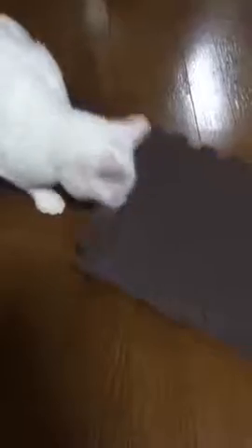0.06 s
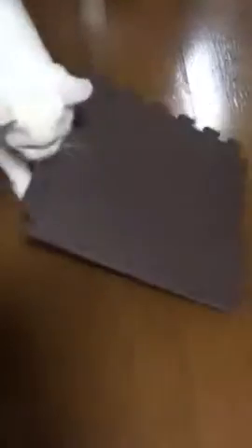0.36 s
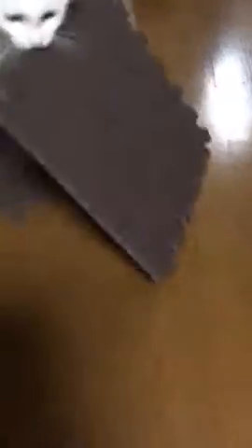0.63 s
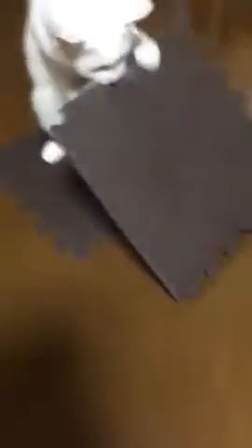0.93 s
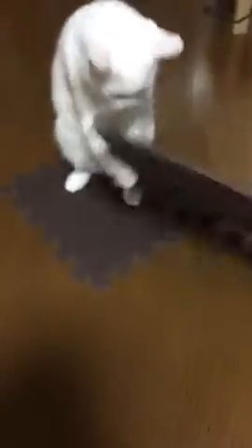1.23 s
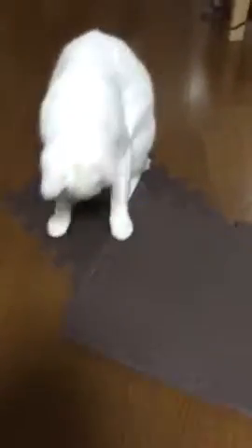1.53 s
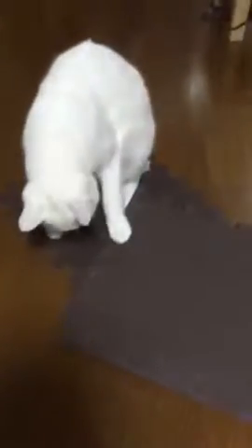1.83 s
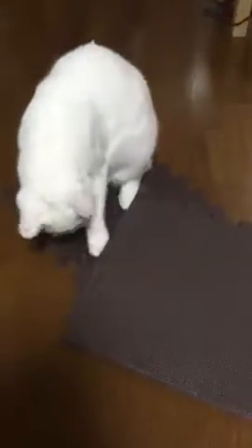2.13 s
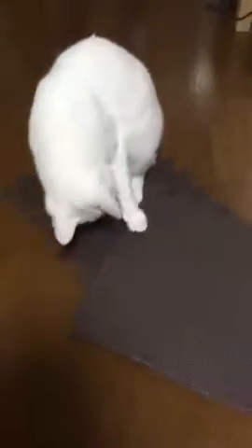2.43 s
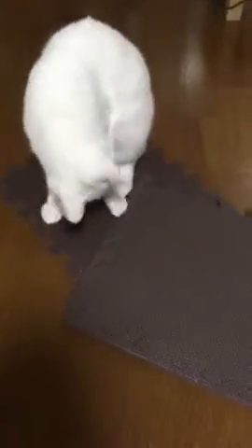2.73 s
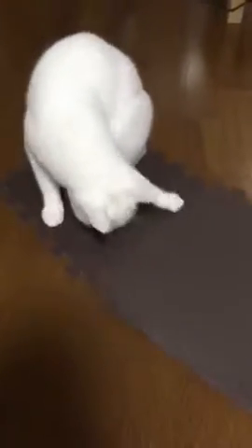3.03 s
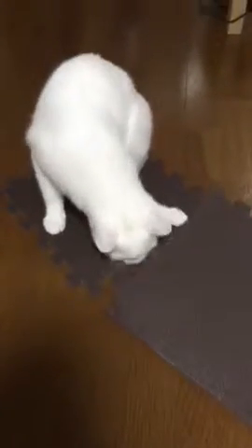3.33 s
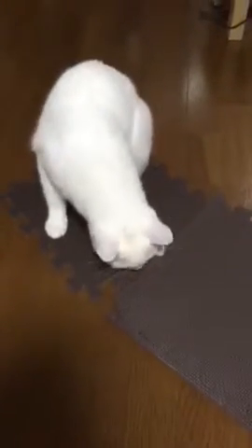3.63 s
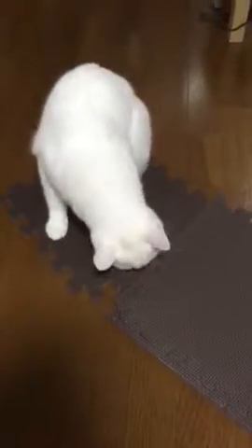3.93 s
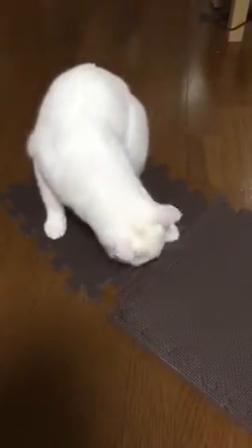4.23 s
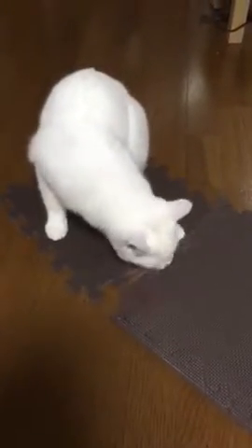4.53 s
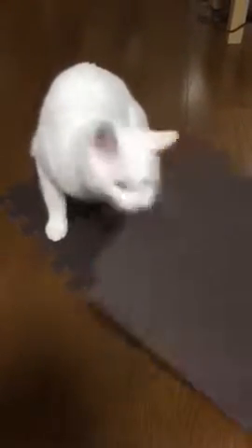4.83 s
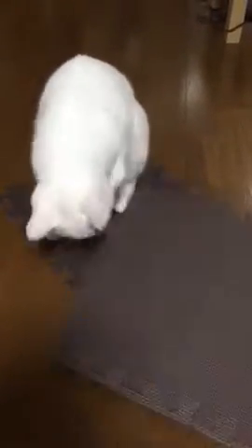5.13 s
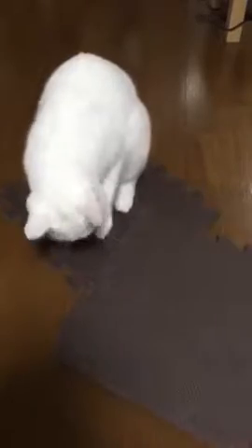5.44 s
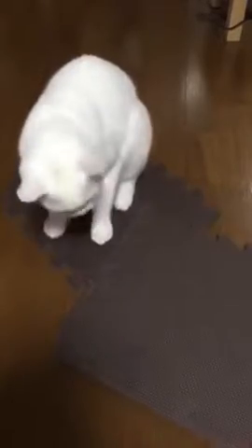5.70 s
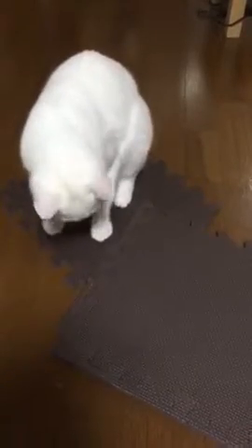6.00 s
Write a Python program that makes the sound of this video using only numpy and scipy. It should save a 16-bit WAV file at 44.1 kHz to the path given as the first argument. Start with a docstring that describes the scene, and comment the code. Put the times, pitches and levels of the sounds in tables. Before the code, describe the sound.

Claws snap out of a foam mat, which flops and slides lightly on a wooden floor while an appliance hums quietly.

```python
"""A cat picks at a loose foam floor mat in a small room with a wooden floor.
Claws and teeth snap out of the foam, twice loudly, and the mat taps and flops onto the boards.
A faint squeak follows, then soft strokes of paws and mat sliding, with a few light taps.
Near the end the mat swishes as it lifts and lands in a flurry of taps, snaps and thumps.
A mains appliance hums quietly throughout."""
import sys
import numpy as np
from scipy import signal
from scipy.fft import rfft, irfft, next_fast_len
from scipy.io import wavfile
from scipy.ndimage import uniform_filter1d

SR = 44100
rng = np.random.default_rng(int(sys.argv[2]) if len(sys.argv) > 2 else 0)


def unload_audio(sound):
    """Save the sound as a 16-bit wav file, at the path given as the first command line argument."""
    columns = np.transpose(np.atleast_2d(sound))
    # keep every value between -1 and 1, then stretch to whole-number steps
    steps = np.round(np.clip(columns, -1, 1) * 32767)
    wavfile.write(sys.argv[1], SR, steps.astype(np.int16))


N = 267521

# modes of the floor boards: f/Hz, width/Hz, gain/dB
BOARD_MODES = [(476, 280, 0.5), (699, 70, -1), (940, 210, 0), (1173, 122, -2.5), (1340, 160, 0.5),
               (1610, 180, -6), (1950, 290, -5), (2300, 850, -3.5), (3740, 2000, 1.5)]


def snaps(echo_db=-1.0):
    """Foam cells tear as a claw or tooth lets go: a very short, bright crack."""
    # slips off the foam: t/s, level/dB, tearing time/ms, tilt above 2 kHz/(dB per octave)
    tears = [(.3306, -20, 1.36, 1.5), (0.72, -57, 3.4, -5), (.728, -46.5, 2.2, -3.5),
             (.842, -53.5, 11, 4.5), (.877, -51.5, 3.2, -1.5), (1.092, -45.5, 1.5, 5.5),
             (1.178, -45.5, 1.8, 3.5), (1.2072, -21, 1.4, 0), (1.346, -54, 2.4, -1.5),
             (1.398, -55.5, 3.5, 7), (1.449, -55.5, 8.8, 1), (1.574, -40.5, 8.7, -6.5),
             (1.6029, -33.5, 0.72, -6.5), (2.483, -53, 2.2, -6.5), (2.498, -56, 2, -8),
             (3.119, -51, .7, -5), (3.843, -54, 5, 4), (4.42, -56.5, 2.2, -2.5), (4.515, -59.5, 1.5, 1.5),
             (4.934, -45.5, 1.8, 4.5), (4.939, -43.5, 1.4, -0.5), (5.103, -54, 4, 9),
             (5.229, -52.5, 0.74, 1), (5.3085, -47, 1, -5.5), (5.333, -46.5, .58, -8),
             (5.357, -35, 0.88, -6.5), (5.3646, -43, .79, -10), (5.416, -45, 1.1, -8),
             (5.805, -50.5, 1.3, 12.5)]
    # tone of tearing foam: f/Hz, gain/dB
    tear_spectrum = [(300, -18.5), (900, -8.5), (2500, 1), (3500, -6.5), (5200, -3), (6400, 2), (7500, 0.5),
                     (9700, 2.5), (10800, -2.5), (11800, 5.5), (13000, -1.5), (15000, 5), (16500, -15)]
    out = np.zeros(N)
    for start, db, tear_ms, tilt in tears:
        tear = rupture(tear_ms, grain_db=4.0)
        hz = bins(len(tear))
        tone = at_hz(tear_spectrum, hz) + tilt * np.log2(np.maximum(hz, 2000))
        add(out, start, radiate(tear, tone - tone.max(), db, echo_db))
    return out


def taps(hollow_db=5, hollow_octaves=0.61, mode_shift=0.062, tap_echo_db=2.5, flex_echo_db=3.0):
    """The mat's edge slaps the boards with a dull, hollow tick, and the sheet flexes in damped modes."""
    # edge hits: t/s, tap level/dB, tap centre/Hz, contact time/ms, flex level/dB
    hits = [(.248, -52.5, 1015, 3.5, -51), (.331, -36.5, 1030, 0.35, -54), (.4719, -41, 1020, 2.3, -44.5),
            (.486, -50, 1150, 13, -48.5), (.614, -58, 1080, 11, -60), (.727, -60, 1440, 13, -50),
            (0.8413, -44.5, 546, 1.4, -37), (.852, -50, 910, 1.8, -37.5), (1.074, -42, 1210, 1.5, -38.5),
            (1.2075, -25, 1020, 1.1, -23), (1.578, -29, 1390, 3.3, -35), (1.603, -36, 1470, 6.7, -33.5),
            (2.483, -50, 1720, 7.3, -58), (2.812, -56, 1700, 1.4, -76), (3.023, -68, 1000, 8.4, -51.5),
            (3.06, -65, 1000, 8.2, -54), (3.093, -51, 1910, 7.3, -49.5), (3.136, -47, 1000, 3, -56),
            (3.143, -40, 2160, 5.5, -55), (3.156, -48.5, 1500, 3.3, -45), (3.589, -61, 1200, 5, -72),
            (3.736, -61.5, 1200, 4.6, -70.5), (3.867, -60, 1300, 3.2, -59), (4.934, -47, 766, 2.1, -46),
            (5.087, -59, 780, 4.5, -49), (5.11, -42.5, 1050, 0.78, -47), (5.221, -44, 1190, 0.69, -43),
            (5.228, -37.5, 740, 4.1, -39.5), (5.306, -38, 824, 4.1, -44), (5.333, -41, 1190, 5.6, -44.5),
            (5.358, -41.5, 1980, 4.5, -41.5), (5.385, -38, 1560, 3.9, -46.5), (5.402, -41, 1320, 4.1, -44),
            (5.416, -52, 1980, 13, -48.5)]
    # bending modes of the foam sheet: f/Hz, width/Hz, gain/dB
    sheet_modes = [(140.6, 18, -1.5), (212, 84, 1), (298, 64, -0.5), (397, 55, -1.5), (570, 94, -10)]
    low_order, high_order = 1.3, 2.35  # steepness below and above the tap's centre
    out = np.zeros(N)
    for start, tap_db, centre_hz, contact_ms, flex_db in hits:
        contact = rupture(contact_ms, grain_db=3)
        hz = bins(len(contact))
        ratio = np.maximum(hz, 20) / centre_hz
        # each tap is strongest around its centre and falls away steeply in the treble
        skirts = 10 * np.log10((1 + ratio ** (-2 * low_order)) * (1 + ratio ** (2 * high_order)))
        # air trapped under the edge resonates at that centre
        hollow = hollow_db * np.exp(-(np.log2(ratio) / hollow_octaves) ** 2)
        tap_tone = resonances(BOARD_MODES, hz) + hollow - skirts
        add(out, start, radiate(contact, tap_tone, tap_db, tap_echo_db))
        # each grip bends the sheet differently, which shifts its modes
        bend = resonances(sheet_modes, hz * np.exp(mode_shift * rng.standard_normal()))
        soak = 10 * np.log10(1 + (hz / 750) ** 4)  # foam soaks up the treble
        add(out, start, radiate(contact, bend - soak, flex_db, flex_echo_db))
    return out


def thumps():
    """Weight lands on a cushion of air: a few low cycles swell and fade."""
    # soft landings of mat and paws: t/s, level/dB, f/Hz, swell/ms
    landings = [(.85, -36.5, 130, 11), (0.874, -45, 64.5, 9.6), (1.101, -46.5, 76, 25),
                (1.2086, -23.5, 253, 2.6), (1.33, -38.5, 72, 8.2), (1.409, -47, 65, 9.2),
                (1.579, -28, 109, 6.6), (1.621, -32, 82, 8.4), (1.662, -44, 56, 12),
                (3.139, -47.5, 71.4, 9.2), (4.861, -47.5, 75, 16), (4.913, -51, 73, 16),
                (5.304, -38.5, 73, 5.8), (5.372, -47, 73, 18)]
    out = np.zeros(N)
    t = np.arange(SR // 4) / SR
    for start, db, hz, swell_ms in landings:
        age = t * 1000 / swell_ms
        envelope = from_db(db) * age * np.exp(1 - age)
        add(out, start, envelope * np.sqrt(2) * np.sin(2 * np.pi * hz * t))
    return out


def slide(hiss_trim_db=-1, scrape_trim_db=-2.5, board_share=0.65, echo_db=1.0):
    """Paws and mat drag: a fine hiss from the texture, a coarser scrape that stirs the boards."""
    # rubs over the foam, before the trims: t/s, swell/s, hold/s, hiss level/dB, scrape over hiss/dB
    strokes = [(-0.001, 0.17, .005, -56.5, -7), (0.14, 0.025, 0.13, -62.5, -2),
               (0.385, 0.068, 0.096, -64.5, -17), (0.522, 0.098, 0.074, -60.5, -13.5),
               (0.815, 0.019, 0.13, -66.5, -5.5), (0.996, 0.013, 0.017, -57, -7),
               (1.023, 0.072, 0.12, -58.5, -7), (1.484, 0.056, 0.095, -65, -7),
               (1.674, 0.047, 0.18, -79, 9.5), (2.177, 0.16, .015, -62.5, -1),
               (2.597, 0.058, 0.024, -57, -5.5), (2.72, 0.023, .01, -66, -10),
               (2.786, 0.064, 0.044, -65, 0.5), (2.932, 0.054, .21, -56, -3),
               (3.577, 0.013, .005, -67, -10), (3.718, 0.017, .01, -67, -5), (3.812, 0.023, .025, -70, 2.5),
               (3.991, 0.036, .015, -65, 0), (4.137, 0.055, 0.12, -65.5, -1), (4.382, 0.034, .03, -71.5, 1),
               (4.66, 0.072, 0.21, -64.5, -5), (4.946, 0.019, .005, -52.5, -8),
               (5.13, 0.066, .02, -73, -13), (5.274, 0.061, 0.14, -66, 3.5), (5.91, 0.15, .02, -66, -3)]
    # tone of the fine hiss: f/Hz, gain/dB
    hiss_spectrum = [(1500, -31.5), (3000, -17), (4800, -3.5), (6000, -1), (7700, -1.5), (9200, 6),
                     (10500, 0.5), (12000, 6), (14500, 4.5), (15700, 2), (16200, -17)]
    # tone of the coarse scrape: f/Hz, gain/dB
    scrape_spectrum = [(250, -24), (500, -4), (750, -9), (1000, -3), (1400, -3), (2200, -6), (3500, -6.5),
                       (4900, -17.5), (6500, -8), (9000, -26.5)]
    hiss_power, scrape_power = np.zeros((2, N))
    for start, swell, hold, db, scrape_db in strokes:
        power = (from_db(db) * stroke(start, swell, hold)) ** 2
        hiss_power += power
        scrape_power += power * from_db(scrape_db) ** 2
    hz = np.geomspace(200, 10000, 200)
    scrape_tone = at_hz(scrape_spectrum, hz) + board_share * resonances(BOARD_MODES, hz)
    hiss = friction(hiss_spectrum, grain_db=1.0, flutter_db=1.0)
    scrape = friction(np.column_stack([hz, scrape_tone]), grain_db=-0.5, flutter_db=1.2)
    rub = from_db(hiss_trim_db) * np.sqrt(hiss_power) * hiss
    rub += from_db(scrape_trim_db) * np.sqrt(scrape_power) * scrape
    echoes = signal.fftconvolve(rub, room(tone_db=np.zeros(SR // 8)))[:N]
    return rub + from_db(echo_db) * echoes


def swish(level_db=-61.5):
    """The lifted mat brushes past its neighbour with a narrow hiss."""
    # resonances of the brushing mat: f/Hz, width/Hz, gain/dB
    peaks = [(3900, 600, -5), (6850, 1200, 2), (8600, 1500, -9)]
    hz = np.geomspace(200, 16000, 200)
    rub = friction(np.column_stack([hz, resonances(peaks, hz)]), grain_db=0.0, flutter_db=1.0)
    return from_db(level_db) * stroke(start_s=4.705, swell_s=0.052, hold_s=0.017) * rub


def squeak(middle_s=1.82, length_s=0.29, top_hz=2340, drop_hz=380, jitter=0.02):
    """A thin, unsteady squeak rises and falls once; only the overtones of its pitch sound."""
    # overtones: multiple of the pitch, level/dB
    partials = [(2, -77), (3, -86), (4, -84)]
    t = np.arange(N) / SR
    droop = np.minimum(((t - middle_s) / (length_s / 2)) ** 2, 1)
    pitch_hz = (top_hz - drop_hz * droop) * (1 + jitter * drift(300))
    phase = 2 * np.pi * np.cumsum(pitch_hz) / SR
    tone = sum(from_db(db) * np.sin(multiple * phase) for multiple, db in partials)
    return np.sqrt(2 * (1 - droop)) * tone


def room(tone_db, early_db=6, early_s=0.0065):
    """Dense echoes from near walls, drawn afresh at random for each sound; the bass rings longest."""
    # reverb bands: f/Hz, t60/s, echo level/dB
    bands = [(100, .4, -4), (243, 0.46, -6.5), (598, 0.25, -5.5), (1400, 0.26, -7), (3000, .29, -3.5),
             (6950, 0.26, -7), (14100, 0.22, -8)]
    size = 2 * (len(tone_db) - 1)
    t, hz = np.arange(size) / SR, bins(size)
    noise = rfft(rng.standard_normal(size)) * rms_one(from_db(tone_db))
    log_centres = np.log([row[0] for row in bands])
    # the first reflections, off the nearest surfaces, stand above the diffuse tail
    arrival = np.clip((t - 0.002) / 0.0026, 0, 1) * from_db(early_db * np.exp(-t / early_s))
    echoes = np.zeros(size)
    for share, (_, t60, db) in zip(np.eye(len(bands)), bands):
        band = irfft(noise * np.interp(np.log(hz + 1), log_centres, share), size)
        fade = np.exp(-np.log(1000) * t / t60) * arrival
        echoes += from_db(db) * band * fade / np.sqrt(np.sum(fade ** 2))
    return echoes


def hum(waver_db=-1.0):
    """A mains appliance hums, wavering a little in pitch and level."""
    # mains harmonics: f/Hz, level/dB
    harmonics = [(59.8, -65), (119.7, -50.5), (179.4, -72.5), (299, -79.5), (359, -78), (479, -82),
                 (538, -90.5)]
    t = np.arange(N) / SR + 0.0002 * drift(4.9)
    tone = sum(from_db(db) * np.sin(2 * np.pi * (hz * t + rng.random())) for hz, db in harmonics)
    return np.sqrt(2) * tone * from_db(waver_db * drift(5))


def air(level_db=-59):
    """The still air of the room: a steady, low bed of noise."""
    # room tone: f/Hz, gain/dB
    air_spectrum = [(20, -32), (32, -4), (60, -5), (100, 3), (160, -8.5), (300, -16), (450, -21.5),
                    (1000, -26), (2300, -31), (3400, -31), (5000, -37.5), (5700, -33.5), (7700, -37),
                    (10500, -35.5), (14000, -33)]
    return from_db(level_db) * shaped(rng.standard_normal(N), air_spectrum)


def rupture(decay_ms, grain_db, size=12288):
    """A run of tiny uneven slips that dies within milliseconds, with an even spread of frequencies."""
    t_ms = 1000 * np.arange(size) / SR
    fade = np.exp(-np.minimum(t_ms / decay_ms, 50))
    noise = rng.standard_normal(size)
    grain = from_db(grain_db * np.clip(rng.standard_normal(size), -2, 2))
    slips = noise * grain * fade
    power = uniform_filter1d(np.abs(rfft(slips)) ** 2, size=240)
    return colour(slips, -10 * np.log10(power + 1e-12))


def radiate(force, tone_db, db, echo_db):
    """A blow with this tone, its loudest 3 ms set to db, followed by its echoes in the room."""
    blow = colour(force, tone_db)
    peak_power = uniform_filter1d(blow ** 2, int(0.003 * SR), mode="constant").max()
    direct = blow * from_db(db) / np.sqrt(peak_power + 1e-20)
    return direct + from_db(echo_db) * np.sqrt(np.sum(direct ** 2)) * room(tone_db)


def friction(spectrum, grain_db, flutter_db):
    """Countless small slips of the textured foam, catching unevenly."""
    slips = rng.standard_normal(N) * from_db(grain_db * np.clip(drift(2000), -2.5, 2.5))
    return shaped(slips * from_db(flutter_db * drift(90)), spectrum)


def stroke(start_s, swell_s, hold_s, release_s=0.025):
    """Envelope of a rub: it gathers speed evenly, holds it and dies away."""
    age = np.arange(N) / SR - start_s
    return np.clip(age / swell_s, 0, 1) * np.exp(-np.maximum(age - swell_s - hold_s, 0) / release_s)


def resonances(modes, hz):
    """Gain in dB of a set of damped modes."""
    power = 0
    for centre, width, db in modes:
        detuning = (hz ** 2 - centre ** 2) / (width * np.maximum(hz, 1))
        power += from_db(db) ** 2 / (1 + detuning ** 2)
    return 10 * np.log10(power + 1e-12)


def colour(x, db):
    """Causal (minimum-phase) filter with a gain in dB for each FFT bin."""
    size = len(x)
    cepstrum = irfft(np.log(from_db(db)), size)
    cepstrum[1:size // 2] *= 2
    cepstrum[size // 2 + 1:] = 0
    return irfft(rfft(x) * np.exp(rfft(cepstrum)), size)


def shaped(x, spectrum):
    """Give a scene-long signal a spectrum, at unit rms."""
    size = next_fast_len(N)
    gain = from_db(at_hz(spectrum, bins(size)))
    return rms_one(irfft(rfft(x, size) * gain, size)[:N])


def drift(rate_hz):
    """A random wander at unit rms."""
    knots = rng.standard_normal(N // 20)
    return rms_one(np.interp(np.arange(N) / SR * rate_hz, np.arange(len(knots)), knots))


def at_hz(spectrum, hz):
    """Read a spectrum's dB on a log-frequency axis."""
    points_hz, points_db = np.transpose(spectrum)
    return np.interp(np.log(np.maximum(hz, 1)), np.log(points_hz), points_db)


def bins(size):
    """Frequencies of a real FFT."""
    return np.arange(size // 2 + 1) * SR / size


def from_db(db):
    """Decibels to gain."""
    return 10 ** (np.asarray(db) / 20)


def rms_one(x):
    """Scale to unit rms."""
    return x / np.sqrt(np.mean(x ** 2) + 1e-20)


def add(out, start_s, x):
    """Mix a short sound in at its start time."""
    start = round(start_s * SR)
    out[start:start + len(x)] += x[:N - start]


def scene():
    """Snaps, taps and thumps stand out; sliding and hum lie underneath."""
    return (snaps() + taps() + thumps() + slide() + swish() + squeak() + hum() + air())[None, :]


def record(dry, low_cut_hz=37, high_cut_hz=16100):
    """The small microphone loses the deepest bass, and the top is cut steeply."""
    thin = signal.sosfilt(signal.butter(4, low_cut_hz, "high", fs=SR, output="sos"), dry)
    return signal.sosfilt(signal.ellip(10, 0.1, 80, high_cut_hz, fs=SR, output="sos"), thin)


dry = scene()
out = record(dry)
unload_audio(out)
```